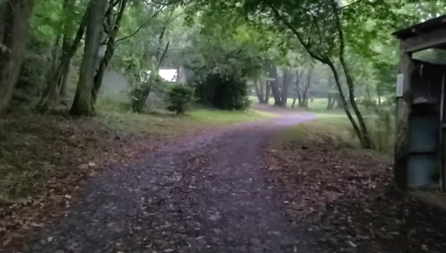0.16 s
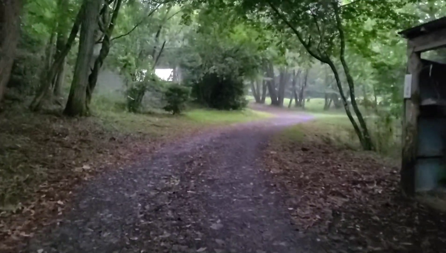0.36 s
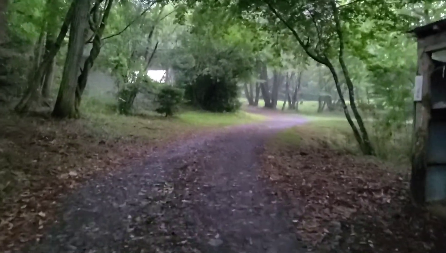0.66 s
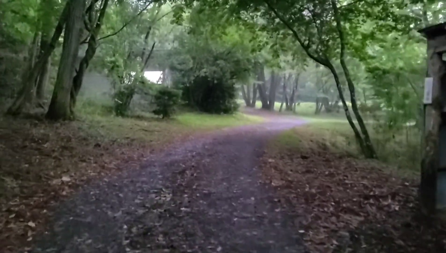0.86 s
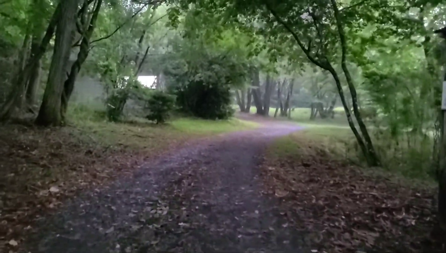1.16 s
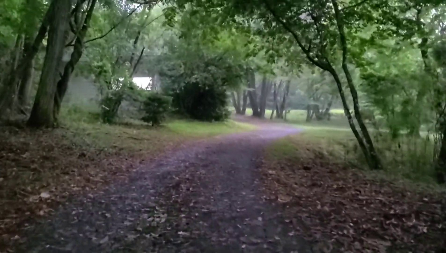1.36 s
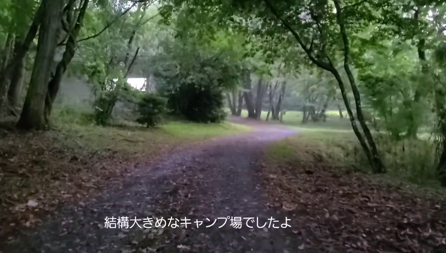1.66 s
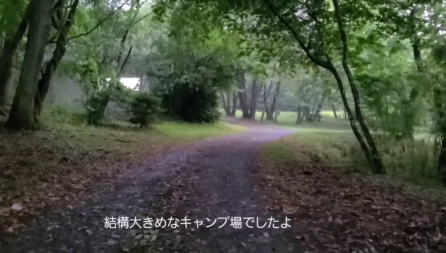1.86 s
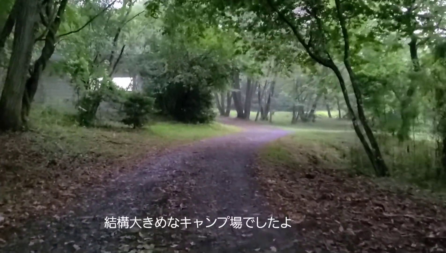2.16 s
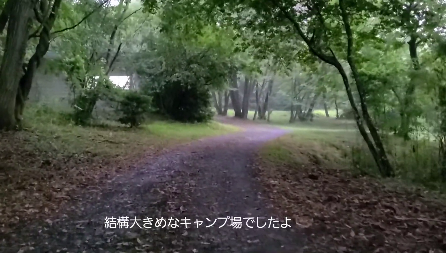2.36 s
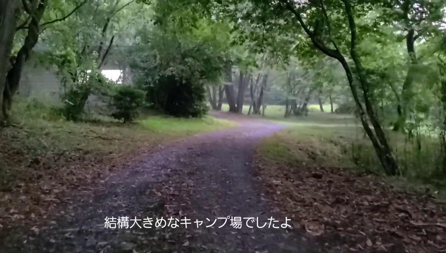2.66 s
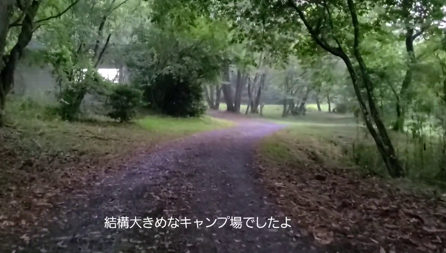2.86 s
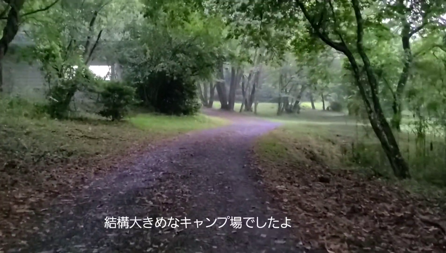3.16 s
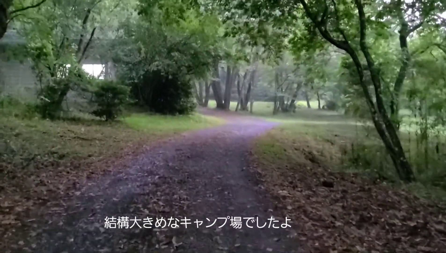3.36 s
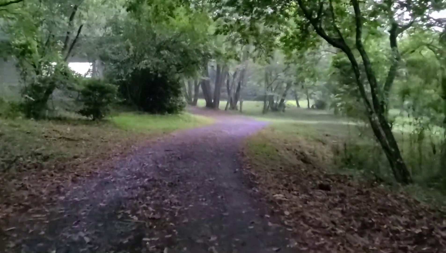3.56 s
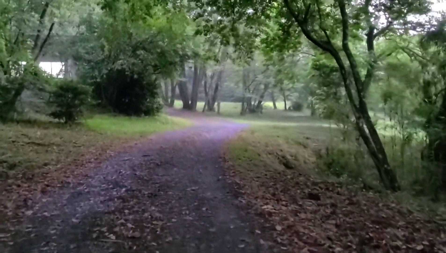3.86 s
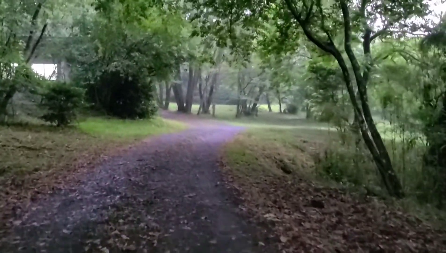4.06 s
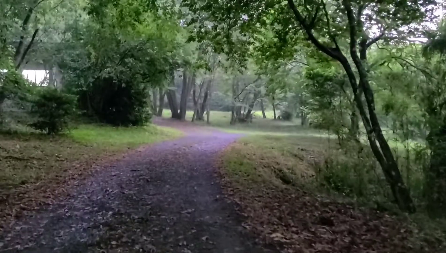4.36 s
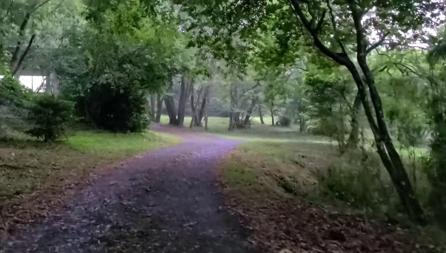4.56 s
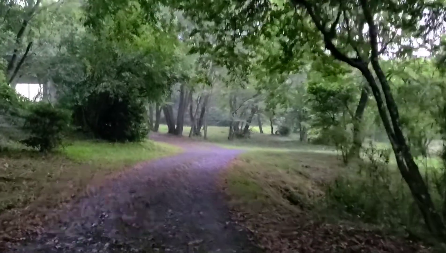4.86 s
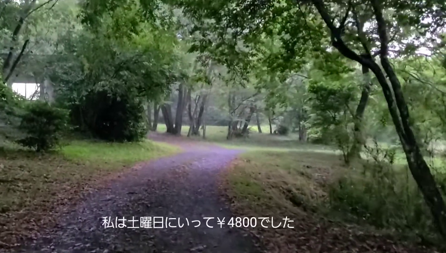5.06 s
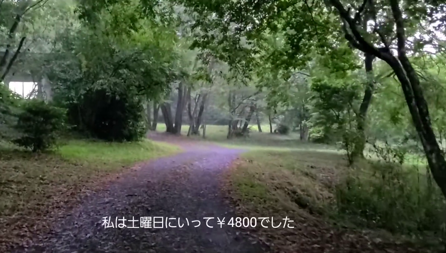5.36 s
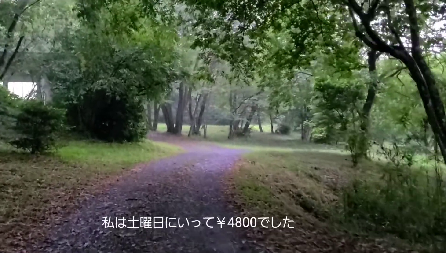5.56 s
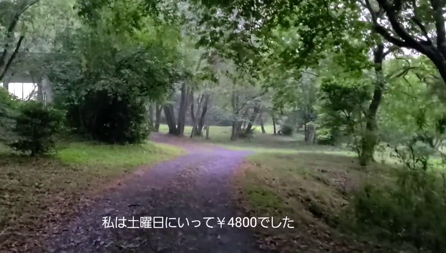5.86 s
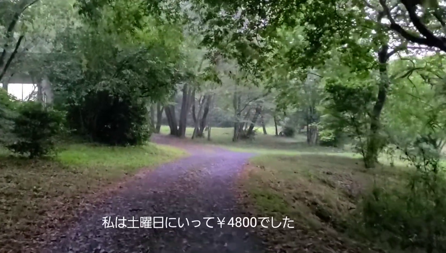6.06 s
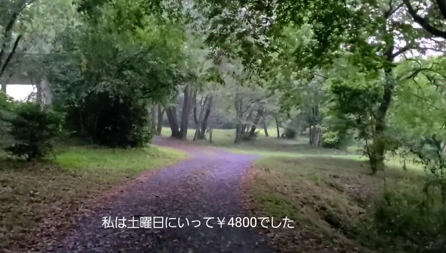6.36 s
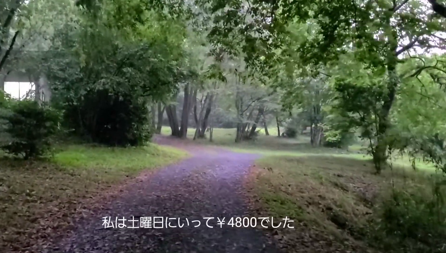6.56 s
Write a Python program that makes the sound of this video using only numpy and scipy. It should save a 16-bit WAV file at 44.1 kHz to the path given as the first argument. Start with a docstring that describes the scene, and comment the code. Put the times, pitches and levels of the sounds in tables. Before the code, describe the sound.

Outdoors in woodland, a bright wash of distant cicadas leans left over soft leaf hiss and faint traffic rumble. A nearer cicada throbs very high and fast, swelling around the middle. Hoarse birds whistle and chirp throughout. Close to the moving stereo microphones, gravel snaps and gritty ticks mark irregular steps, strongest just after three seconds.

```python
"""A walk along a gravel path in summer woods, 6.7 s. From the start: noise of leaves and blurred far cicadas,
filtered traffic rumble, gliding bird whistles and chirps, and a near cicada whose clicks ring body modes in
about 13 throbs/s. A far singer's click comb fades by 4 s as a second grows from the start to full strength at
1.8 s. Stones snap as wavelets amid grit ticks from 0.5 s, loudest near 3.1 s, with low heel thuds from 3 s; the
near cicada peaks near 4 s; snaps and whistles go on to the end."""
import sys
import numpy as np
from scipy import signal
from scipy.fft import rfft, irfft
from scipy.io import wavfile

SR = 44100
rng = np.random.default_rng(int(sys.argv[2]) if len(sys.argv) > 2 else 0)


def unload_audio(sound):
    """Save the sound as a 16-bit wav file, at the path given as the first command line argument."""
    columns = np.transpose(np.atleast_2d(sound))
    # keep every value between -1 and 1, then stretch to whole-number steps
    steps = np.round(np.clip(columns, -1, 1) * 32767)
    wavfile.write(sys.argv[1], SR, steps.astype(np.int16))


N = 296352

# Far traffic, relative spectrum: freq_hz, density_db
RUMBLE_SPECTRUM = [(12, -39), (20, -10), (65, 0.5), (84, -1), (140, -18.5), (180, -30), (310, -120)]
# Leaves and low air, relative spectrum: freq_hz, density_db
AIR_SPECTRUM = [(76, -31), (130, -8.5), (176, -10.5), (435, -7), (922, -4), (1140, -2), (1500, -2),
                (2120, 0), (3010, -1.5), (3600, -11), (4680, -35), (7920, -120)]
# Far cicadas, relative spectrum: freq_hz, density_db
CHORUS_SPECTRUM = [(2000, -24), (3300, -11.5), (3650, -12.5), (4000, -9.5), (4350, -7.5), (4600, -1.5),
                   (5000, -1), (5700, 2.5), (6850, 1), (7500, -7), (8900, -16.5), (11000, -8), (13000, -4),
                   (14500, -2.5), (16000, -10)]
# Left-right likeness of the diffuse sounds: freq_hz, correlation (0 to 1)
LIKENESS = [(35, 0.5), (80, 0.78), (170, 0.9), (350, 0.78), (700, 0.5), (1400, 0.08), (2500, 0), (15000, 0)]
# Stereo lean of the diffuse sounds: freq_hz, left_minus_right_db
LEAN = [(30, 3), (60, -1), (100, 0.5), (180, 1.5), (310, -0.2), (550, 2.5), (950, 0.5), (1650, 3),
        (2860, 6), (4970, 10), (8640, 6), (15000, 8.5)]
# Bands of the hiss with separate random level flutter: edge_hz
FLUTTER_EDGES_HZ = [1500, 1900, 2300, 2700, 3100, 3500, 3900, 4300]
# Chorus level and extra lean: time_s, level_db, left_minus_right_db
CHORUS_LEVEL = [(0, -31, -2.5), (1.3, -32, -3), (4.06, -31, -4), (6.72, -30.5, -4.5)]
# Two steady far singers, one curve each: time_s, clicks_per_s, level_db (before the tymbal band)
DRONES = [
    [(0, 380.5, -5), (1.5, 380.5, -5), (2.2, 380, -8), (3.2, 380, -11), (4, 380, -30), (6.72, 380, -44)],
    [(0, 393, -25), (1.8, 392.5, -5), (4.2, 392, -3), (4.6, 390, -4), (5.1, 387.5, -4), (6.72, 386, -4.5)],
]
# Tymbal resonance of each steady singer: low_hz, high_hz
DRONE_BANDS = [(4300, 5500), (4700, 6200)]
# Gliding whistles: start_s, length_s, from_hz, to_hz, level_db (at 2 kHz), peak (share of length)
SWEEPS = [(.17, .17, 1750, 2900, -49, .9), (.63, .07, 1900, 2700, -48, .4), (.83, .08, 1500, 1750, -46, .5),
          (.9, .14, 1700, 3100, -41.5, .5), (.95, .125, 1900, 3300, -40.5, .75),
          (1.21, .09, 1800, 3100, -47, .7), (1.42, .16, 1750, 3300, -48, .7),
          (1.86, .06, 1900, 2500, -48, .4), (1.98, .05, 2100, 2600, -47, .7),
          (2.1, .1, 2900, 3250, -46, .9), (2.21, .115, 1920, 3150, -40, .45),
          (2.34, .08, 1600, 2100, -46, .5), (2.62, .12, 1750, 3100, -42, .8),
          (3.19, .08, 2200, 2500, -42, .8), (3.31, .07, 1550, 1750, -47, .6),
          (3.32, .07, 2170, 2350, -44, .5), (3.39, .125, 1850, 3100, -39, .5),
          (3.72, .185, 1650, 3150, -40.5, .8), (4.26, .05, 2300, 2750, -47, .8),
          (4.33, .1, 1750, 2900, -45, .85), (4.49, .06, 2000, 2800, -46, .8),
          (4.58, .085, 1750, 3250, -41, .85), (4.86, .09, 3400, 1850, -45, .9),
          (4.95, .08, 1950, 3300, -40, .85), (5.12, .13, 3100, 3400, -48, .8),
          (5.17, .11, 1800, 2900, -42, .85), (5.24, .092, 1950, 3250, -38, .85),
          (5.54, .19, 1950, 2900, -40, .5), (5.71, .07, 2600, 3300, -44, .7),
          (5.77, .05, 2300, 2900, -47, .6), (5.84, .115, 1800, 3400, -39, .7),
          (6.07, .08, 1900, 2700, -47, .5), (6.46, .1, 1850, 2600, -46, .6),
          (6.64, .065, 2350, 3250, -38, .75)]
# Held notes: start_s, length_s, pitch_hz, level_db (at 2 kHz), octave (amplitude ratio)
HELD = [(.27, .1, 2620, -47, 0), (2.97, .11, 1990, -45, 0), (3.2, .11, 1920, -42, 0),
        (3.29, .17, 2650, -47, 0), (3.39, .05, 2850, -44, 0), (4.73, .18, 3840, -45.5, 0),
        (4.98, .15, 1690, -42.5, .2), (5.41, .1, 1800, -41, 0), (6.01, .14, 3900, -48.5, 0),
        (6.23, .21, 1690, -47.5, 1.3)]
# Random bird chatter: time_s, chirps_per_s
CHATTER = [(0, 30), (.7, 30), (.9, 45), (1.3, 25), (2.8, 28), (3.3, 58), (3.7, 35), (4.3, 25), (4.9, 40),
           (5.8, 50), (6.72, 35)]
# Near cicada level: time_s, level_db
SINGER_LEVEL = [(0, -51), (.6, -47), (1.2, -48), (1.7, -45.5), (2.2, -45.5), (2.6, -47), (3.4, -47.5),
                (3.7, -42.5), (4, -40.5), (4.5, -42), (5.2, -44.5), (5.8, -46.5), (6.15, -46.5),
                (6.72, -49)]
# Near cicada body modes: freq_hz, width_hz, level_db, delay (throbs)
BODY_MODES = [(13100, 800, -7, -0.1), (13600, 700, 3.5, -0.08), (14050, 800, 2, -0.03),
              (14900, 1300, -1.5, 0.03), (5050, 680, -7, 0.4), (6990, 200, -5, -0.13)]
# Stones underfoot: time_s, envelope_peak_db, pitch_hz, cycles (nominal length)
SNAPS = [(0.535, -31.5, 1540, 5.1), (0.7117, -38, 580, 2.2), (0.719, -32.5, 1100, 2.5),
         (1.226, -43, 380, 1.6), (1.2312, -31.5, 760, 3), (1.284, -34.5, 970, 4.7),
         (1.334, -30.5, 1250, 2.9), (1.474, -39, 622, 3), (1.478, -47, 340, 2.3), (1.8202, -37, 1200, 2),
         (1.977, -37, 885, 2.5), (2.1062, -31.5, 860, 1.1), (2.425, -37, 810, 1.6), (2.9535, -37, 600, 1.2),
         (2.9656, -29.5, 700, 1.4), (2.977, -37, 500, 1.1), (2.986, -36, 600, 1.3), (2.999, -38, 400, 0.97),
         (3.007, -33, 700, 1.2), (3.0398, -30, 1390, 3.3), (3.1118, -22, 1420, 3.9),
         (3.1331, -14.5, 1510, 4.1), (3.155, -33, 700, 1.2), (3.4624, -22.5, 1088, 1.2),
         (3.4866, -31.5, 785, 1.6), (3.494, -39, 330, 1.7), (3.6387, -29.5, 1193, 2.5),
         (3.7727, -40.5, 900, 7.9), (4.152, -44, 497, 4), (4.6889, -39, 1200, 3.6), (4.722, -35, 1400, 2.7),
         (4.766, -32, 755, 2.3), (4.8892, -37, 876, 4.3), (4.9663, -29, 1170, 1.1), (5.274, -27, 1220, 3.1),
         (5.358, -26.5, 1160, 1.6), (5.4142, -38, 1050, 2.6), (5.4541, -32, 706, 2.9),
         (5.483, -21.5, 1270, 0.85), (6.0284, -21.5, 1300, 3.6), (6.3509, -32, 1430, 2.9),
         (6.3868, -38, 1110, 3), (6.414, -29.6, 1373, 3.8), (6.6264, -28, 1210, 1.4)]
# Heel on the ground: time_s, peak_db
THUDS = [(2.96, -49), (5.333, -52.5), (5.44, -59)]

RUMBLE_DB, RUMBLE_SWAY_DB = -56.5, 0.8
AIR_DB, AIR_SWAY_DB = -50.5, 0.6
THROBS_PER_S, FIRST_THROB_S = 12.825, 0.078
WEAK_SIDE_DB = 3   # every other click is softer by this
BEAD_DB, BEAD_DELAY_THROBS = 3, 0.41   # the steady far singers throb too
SHIMMER_HZ = 380   # width of their flickering bands
GLIDE_POWER = 2.3   # glides start slowly, end fast
HELD_PEAK, FADE_DB = .45, 10   # loudest share of length; loss one length away
BIRD_BRIGHT_DB = 4.5   # gain per octave above 2 kHz
CHIRP_LENGTH_S, CHIRP_START_HZ = (.02, .06), (1800, 3300)   # ranges
CHIRP_PITCH_RATIO, CHIRP_LEVEL_DB = (1.0, 1.4), (-54, -48)   # ranges, level at 2 kHz
BREATH = .7   # depth of the noisy flutter in the whistles
BIRD_DIRECT_DB, BIRD_TREES_DB = -5.5, -3.5
SINGER_CLICKS_PER_S = 377
SNAP_LEAN_DB, SNAP_SCATTER_DB = 0.5, 0.5   # left minus right: mean, spread
CRACK_DB, PUSH_DB = -14, -23   # against the main wavelet
GRIT_PER_S, CRUNCH_DB, CRUNCH_S = 40, 15, 0.027   # base rate; rate gain (20 log) and reach at a stone
CUTOFF_HZ = 15500


def from_db(db):
    """Decibels to amplitude gain."""
    return 10 ** (np.asarray(db) / 20)


def rms_one(x):
    """Scale to unit rms."""
    return x / np.sqrt(np.mean(x ** 2) + 1e-20)


def in_time(rows):
    """Columns of a time curve, interpolated at each sample."""
    time_s, *columns = np.transpose(rows)
    return [np.interp(np.arange(N) / SR, time_s, column) for column in columns]


def at_hz(points, hz):
    """Read a spectrum table on a log-frequency axis."""
    table_hz, values = np.array(points).T
    return np.interp(np.log(hz), np.log(table_hz), values)


def drift(corner_hz):
    """Unit-rms random wander: two-pole lowpass noise, computed at SR / 40."""
    r = np.exp(-80 * np.pi * corner_hz / SR)
    noise = rng.standard_normal(N // 40 + 2002)
    slow = signal.lfilter([1], [1, -2 * r, r * r], noise)[2000:]   # drop the settling
    return np.interp(np.arange(N) / 40, np.arange(len(slow)), rms_one(slow))


def ring(clicks, hz, t60_s):
    """Two-pole resonator: each unit click starts a decaying sine of height 1."""
    r, w = from_db(-60 / (t60_s * SR)), 2 * np.pi * hz / SR
    return signal.lfilter([0, np.sin(w)], [1, -2 * r * np.cos(w), r * r], clicks + 1e-18)


def sides(left_minus_right_db):
    """Left and right gains for a level difference."""
    return from_db(np.array([left_minus_right_db / 2, -left_minus_right_db / 2]))


def coloured(pair, spectrum):
    """Shape two unrelated flat sounds to a spectrum, likeness and lean; mid rms 1."""
    hz = np.maximum(np.arange(N // 2 + 1) * SR / N, 1)
    mid, side = rfft(pair) * from_db(at_hz(spectrum, hz))
    alike = np.clip(at_hz(LIKENESS, hz), -.99, .99)
    both = np.sqrt(1 + alike) * mid + np.sqrt(1 - alike) * side * [[1], [-1]]
    out = irfft(both * sides(at_hz(LEAN, hz)), N)
    return out / np.std(out.mean(axis=0))


def band_flutter(x, edges_hz, sway_db, corner_hz):
    """Give each band between the edges its own random level flutter."""
    out = x.copy()
    for low_hz, high_hz in zip(edges_hz, edges_hz[1:]):
        band = signal.butter(2, [low_hz, high_hz], "band", fs=SR, output="sos")
        out += (from_db(sway_db * drift(corner_hz)) - 1) * signal.sosfilt(band, x)
    return out


def trees(x, t60_s):
    """Scatter among trunks: a decaying noise tail, independent for each ear."""
    t = np.arange(int(.4 * SR)) / SR
    tail = rng.standard_normal((2, len(t))) * from_db(-60 * t / t60_s)
    tail /= np.sqrt(np.sum(tail ** 2, axis=1, keepdims=True))
    return signal.fftconvolve(x[None], tail, axes=1)[:, :N]


def click_train(per_s, jitter, jitter_hz, uneven_db):
    """Two tymbals click in turn, once per cycle of a wavering rate, with uneven sizes."""
    rate = per_s * (1 + jitter * drift(jitter_hz))
    turns = np.floor(np.cumsum(rate) / SR + rng.random())
    size_db = uneven_db * rng.standard_normal(N) - WEAK_SIDE_DB * (turns % 2)
    return (np.diff(turns, prepend=0) > 0) * from_db(size_db)


def traffic_rumble():
    """Far traffic: low coloured noise with a slow sway."""
    level_db = RUMBLE_DB + RUMBLE_SWAY_DB * drift(3.7)
    return from_db(level_db) * coloured(rng.standard_normal((2, N)), RUMBLE_SPECTRUM)


def low_air():
    """Leaves and blurred far sound: coloured noise with a slow sway."""
    level_db = AIR_DB + AIR_SWAY_DB * drift(4.0)
    return from_db(level_db) * coloured(rng.standard_normal((2, N)), AIR_SPECTRUM)


def chorus():
    """Many far cicadas blur to noise; two keep a click rate that shows as a comb of lines."""
    level_db, pan_db = in_time(CHORUS_LEVEL)
    pair = rng.standard_normal((2, N)) * from_db(0.6 * drift(24.0))
    throbs = THROBS_PER_S * (np.arange(N) / SR - FIRST_THROB_S)
    bead_db = BEAD_DB * np.cos(2 * np.pi * (throbs - BEAD_DELAY_THROBS))
    for drone, band_hz in zip(DRONES, DRONE_BANDS):
        clicks_per_s, drone_db = in_time(drone)
        body = signal.butter(3, band_hz, "band", fs=SR, output="sos")
        clicks = rms_one(click_train(clicks_per_s, jitter=.0055, jitter_hz=20.0, uneven_db=2.5))
        song = signal.sosfilt(body, clicks)
        heard = [[1.1], [.4]] * song[None] + .7 * trees(song, t60_s=0.3)
        heard = band_flutter(heard, np.arange(*band_hz, SHIMMER_HZ), sway_db=2.5, corner_hz=14.0)
        ear_sway_db = 0.85 * np.array([drift(31.0), drift(22.0)])
        pair += from_db(drone_db + bead_db + ear_sway_db) * heard
    return from_db(level_db) * sides(pan_db) * coloured(pair, CHORUS_SPECTRUM)


def chatter():
    """Short chirps of random time, pitch and glide, as whistle arguments."""
    chirps_per_s, = in_time(CHATTER)
    draws = rng.random((400, 6))
    starts_s = draws[:, 0] * (N / SR - .1)
    chance = chirps_per_s[(starts_s * SR).astype(int)] * N / SR / len(draws)
    sung = draws[:, 1] < chance
    ranges = [CHIRP_LENGTH_S, CHIRP_START_HZ, CHIRP_PITCH_RATIO, CHIRP_LEVEL_DB]
    length_s, hz, ratio, level_db = [low + (high - low) * draws[:, k + 2]
                                     for k, (low, high) in enumerate(ranges)]
    return [(starts_s[k], length_s[k], hz[k], hz[k] * ratio[k], level_db[k], HELD_PEAK, 0)
            for k in np.flatnonzero(sung)]


def whistle(start_s, length_s, from_hz, to_hz, level_db, peak, octave, waver):
    """One note, a gliding sine plus its octave: sample indices and sound."""
    i = np.arange(int(start_s * SR), min(int((start_s + length_s) * SR), N))
    gone = np.linspace(0, 1, len(i))
    hz = from_hz * (to_hz / from_hz) ** gone ** GLIDE_POWER
    phase = 2 * np.pi * np.cumsum(hz * waver[i]) / SR
    edge = np.clip(np.minimum(gone, 1 - gone) * length_s / .008, 0, 1)   # 8 ms ramps
    gain_db = level_db - FADE_DB * np.abs(gone - peak) + BIRD_BRIGHT_DB * np.log2(hz / 2000)
    return i, from_db(gain_db) * edge * (np.sin(phase) + octave * np.sin(2 * phase))


def birds():
    """Hoarse whistles and chirps, heard directly and scattered by trees."""
    out, waver = np.zeros(N), 1 + 0.016 * drift(90.0)
    notes = [(*row, 0) for row in SWEEPS]
    notes += [(start_s, length_s, hz, hz, level_db, HELD_PEAK, octave)
              for start_s, length_s, hz, level_db, octave in HELD]
    for note in notes + chatter():
        i, sound = whistle(*note, waver)
        out[i] += sound
    # leaves and motion break up the level
    out *= from_db(2.5 * drift(40.0)) * (1 + BREATH * drift(220.0))
    direct = np.array([out, np.roll(out, 9)])   # right ear 9 samples late
    return from_db(BIRD_DIRECT_DB) * direct + from_db(BIRD_TREES_DB) * trees(out, t60_s=.16)


def near_singer():
    """Clicks ring the body modes; the pumping abdomen opens each mode once per throb."""
    level_db, = in_time(SINGER_LEVEL)
    # the pumping is not quite even
    throbs = THROBS_PER_S * (np.arange(N) / SR - FIRST_THROB_S) + .04 * drift(3.0)
    clicks = click_train(SINGER_CLICKS_PER_S, jitter=.02, jitter_hz=2.0, uneven_db=2.5)
    rasp = rms_one(clicks) + .5 * rng.standard_normal(N)
    out = np.zeros(N)
    for hz, width_hz, mode_db, delay in BODY_MODES:
        opening = np.exp(1.2 * (np.cos(2 * np.pi * (throbs - delay)) - 1))
        t60_s = 1.5 / width_hz
        mode = ring(ring(rasp, hz, t60_s), hz, t60_s)
        out += from_db(mode_db) * opening * rms_one(mode)
    highpass = signal.butter(4, 4200, "high", fs=SR, output="sos")
    out = from_db(level_db) * signal.sosfilt(highpass, out)
    direct = from_db(-1.0) * out * sides(7.1)[:, None]
    return direct + from_db(-2.0) * trees(out, t60_s=0.027) * sides(2.2)[:, None]


def stone_snap(t, hz, cycles):
    """A short wavelet with a crack an octave up and a low push at a third of the pitch."""
    spread_s = np.where(t < 0, .2, .24) * cycles / hz   # falls a little slower than it rises
    snap = np.exp(-np.abs(t / spread_s) ** 2.0) * np.sin(2 * np.pi * hz * t)
    snap += from_db(CRACK_DB) * np.exp(-(t * hz / .4) ** 2) * np.sin(4 * np.pi * hz * t)
    snap += from_db(PUSH_DB) * np.exp(-(t * hz / 1.2) ** 2) * np.sin(2 * np.pi * hz / 3 * t)
    return snap


def heel_thuds():
    """Each heel strike rings the ground at 169 Hz."""
    heels = np.zeros(N)
    for time_s, peak_db in THUDS:
        heels[int(time_s * SR)] = from_db(peak_db)
    return ring(heels, 169.0, 0.2)


def grit_ticks(nearness):
    """Random small clicks ring six pitches, most densely around the stones."""
    struck = rng.random(N) < GRIT_PER_S * from_db(CRUNCH_DB * nearness) / SR
    size = from_db(4.5 * np.minimum(rng.exponential(1, N), 3))
    grit = struck * size * rng.choice([-1, 1], N)
    dealt = rng.integers(0, 6, N)   # which pitch each grain rings
    ticks = sum(ring(grit * (dealt == k), hz, 2.36 / hz)
                for k, hz in enumerate(np.geomspace(300, 2200, 6)))
    highpass = signal.butter(2, 250, "high", fs=SR, output="sos")
    return from_db(-52.0) * signal.sosfilt(highpass, ticks)


def gravel():
    """Footsteps: stone snaps, heel thuds and grit, with a faint scatter from the trees."""
    out, t, nearness = np.zeros((2, N)), np.arange(-300, 300) / SR, np.zeros(N)
    pans_db = SNAP_LEAN_DB + SNAP_SCATTER_DB * rng.standard_normal(len(SNAPS))
    for (time_s, level_db, hz, cycles), pan_db in zip(SNAPS, pans_db):
        i = int(time_s * SR) - len(t) // 2
        out[:, i:i + len(t)] += from_db(level_db) * sides(pan_db)[:, None] * stone_snap(t, hz, cycles)
        nearness = np.maximum(nearness, np.exp(-np.abs(np.arange(N) / SR - time_s) / CRUNCH_S))
    out += heel_thuds() + grit_ticks(nearness)
    return out + from_db(-10) * trees(out.mean(axis=0), t60_s=.1)


def scene():
    """Sum of all sources at the two microphones."""
    hiss = band_flutter(low_air() + chorus(), FLUTTER_EDGES_HZ, sway_db=2.2, corner_hz=12.0)
    return traffic_rumble() + hiss + birds() + near_singer() + gravel()


def record(dry):
    """Steep elliptic lowpass on the treble."""
    lowpass = signal.ellip(14, .3, 75, CUTOFF_HZ, fs=SR, output="sos")
    return signal.sosfilt(lowpass, dry)


dry = scene()
out = record(dry)
unload_audio(out)
```